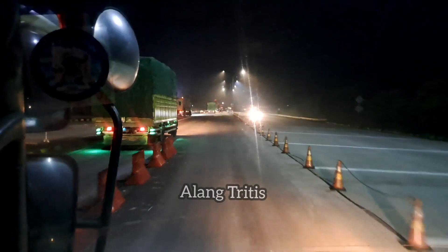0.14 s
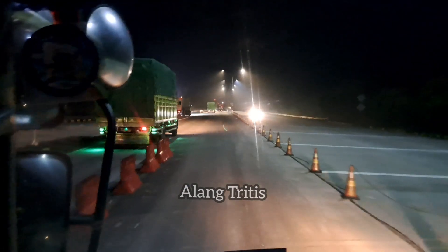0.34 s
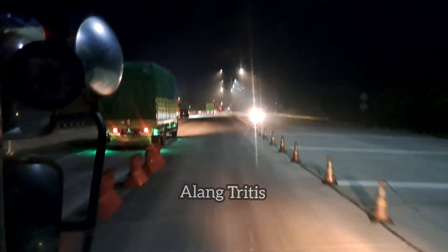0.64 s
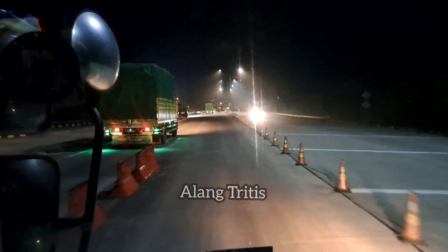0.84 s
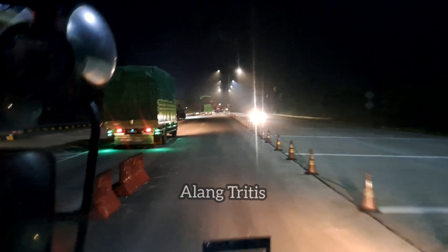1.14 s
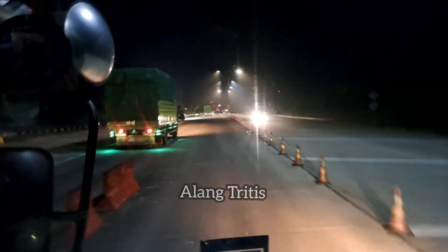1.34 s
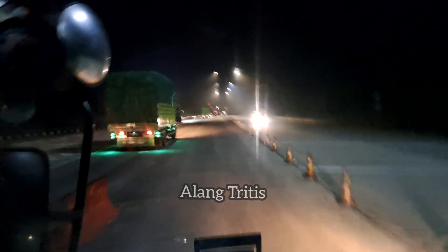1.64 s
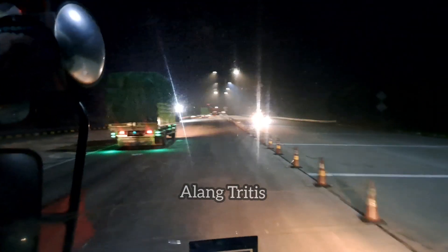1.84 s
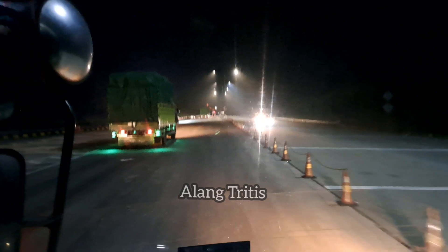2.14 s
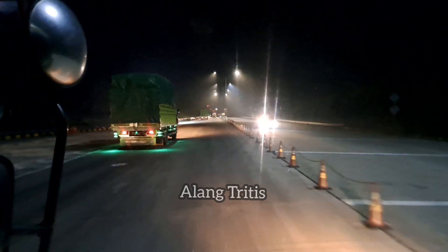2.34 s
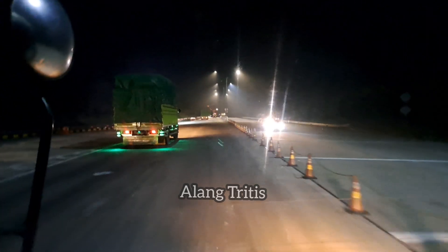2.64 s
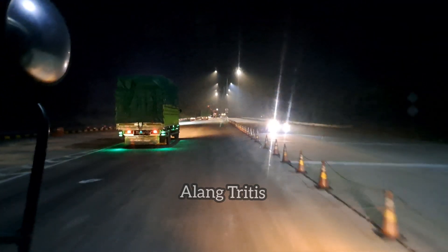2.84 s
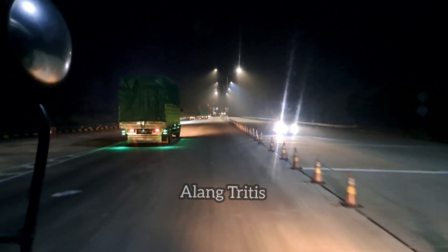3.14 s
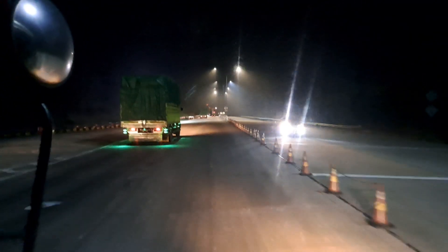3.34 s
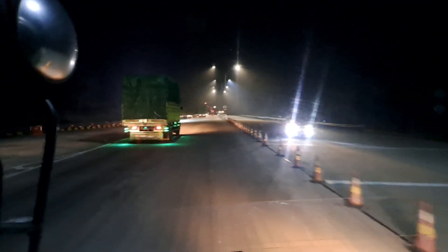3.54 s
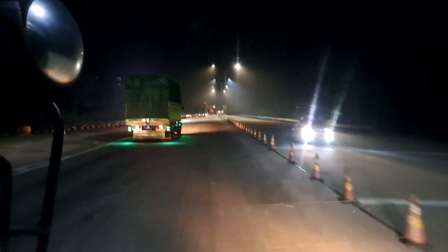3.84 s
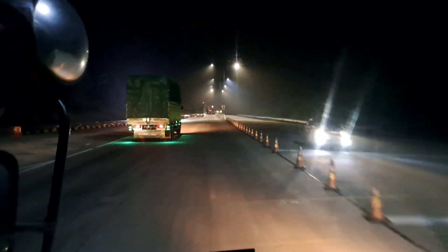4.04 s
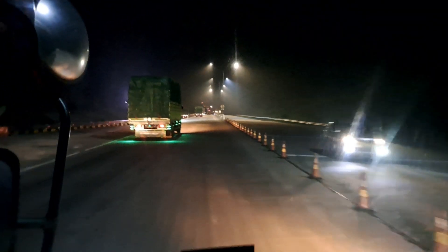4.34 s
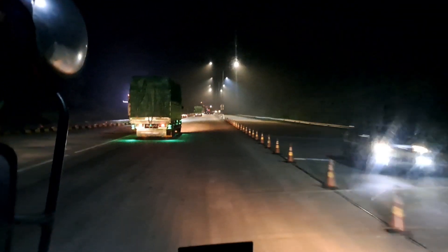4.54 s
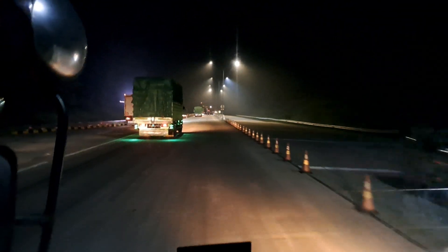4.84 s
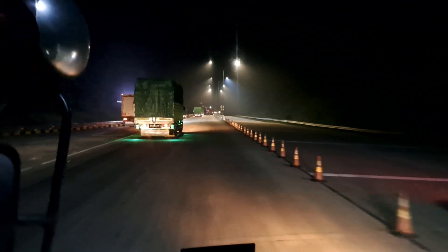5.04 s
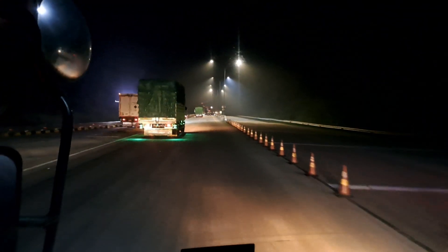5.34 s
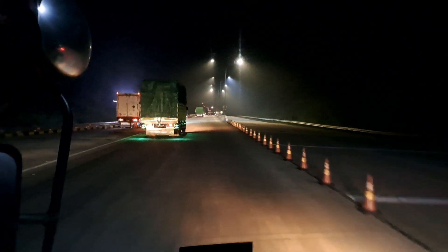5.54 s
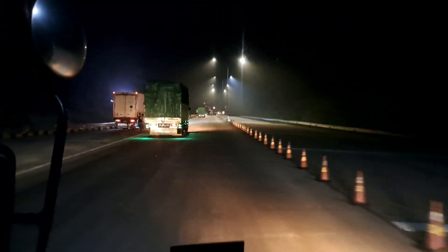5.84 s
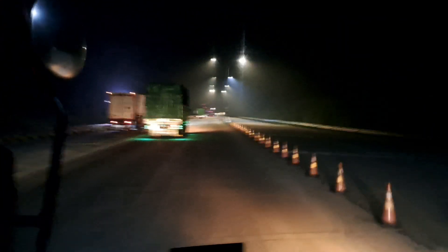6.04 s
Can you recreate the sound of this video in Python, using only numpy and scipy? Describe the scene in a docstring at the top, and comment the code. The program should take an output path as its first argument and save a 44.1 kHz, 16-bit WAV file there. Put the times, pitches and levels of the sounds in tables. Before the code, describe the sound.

Deep diesel boom and fan hum climb over tyre rumble, two short air hisses, then a falling growl, three blips, cab knocks and a renewed pull.

```python
"""In the cab of a diesel truck gathering speed on a road, heard at a microphone with two ports.
Engine and fan pull up in pitch over tyre rumble and driveline hum, and compressed air spits twice.
Then the throttle lifts: the turbo whistle sinks, the engine growls as its revs fall, the cab air drones.
Three throttle blips sound a gear change and bumps knock the cab, then the engine pulls again.
Turning sources are sines, air and tyres are shaped noise, panels and cab are ringing filters."""
import sys
import numpy as np
from scipy import signal
from scipy.io import wavfile

SR = 44100
rng = np.random.default_rng(int(sys.argv[2]) if len(sys.argv) > 2 else 0)


def digitize_waveform(pressure):
    """Quantize a signal to 16-bit integers and store it at the path in sys.argv[1].

    Rows of a 2-D input are taken as channels; values are limited to [-1, 1].
    """
    field = np.atleast_2d(pressure).T
    bounded = np.clip(field, -1, 1)
    quanta = np.round(bounded * 32767).astype(np.int16)
    wavfile.write(sys.argv[1], SR, quanta)


N = 273420
TIME = np.arange(N) / SR   # s
# Levels in the tables are relative: the functions that play them may add trims and flicker.


def from_db(db):
    """Decibels to gain."""
    return 10 ** (np.asarray(db) / 20)


def rms_one(x):
    """Scale to unit rms."""
    return x / np.sqrt(np.mean(x ** 2) + 1e-20)


def in_time(rows):
    """Each column of a curve table, joined by straight lines, at every sample."""
    s, *columns = np.transpose(rows)
    return [np.interp(TIME, s, column) for column in columns]


def at_hz(points, hz):
    """Read a spectrum on a log-frequency axis."""
    point_hz, values = np.array(points).T
    return np.interp(np.log(hz), np.log(point_hz), values)


def drift(rate_hz):
    """Smooth chance motion of spread 1: noise through two equal one-pole low-passes at rate_hz."""
    step = 40   # samples between computed points
    pole = np.exp(-2 * np.pi * rate_hz * step / SR)
    white = rng.standard_normal(N // step + 2002)
    slow = signal.lfilter([1], [1, -2 * pole, pole * pole], white)[2000:]   # settled part
    return np.interp(np.arange(N) / step, np.arange(len(slow)), rms_one(slow))


def turning(hz):
    """Phase of something that turns at a changing rate."""
    return 2 * np.pi * np.cumsum(hz) / SR


def tone(phase, db):
    """A sine of the given rms level."""
    return np.sqrt(2) * from_db(db) * np.sin(phase)


def ring(x, hz, t60):
    """A mode: a unit click sets a sine of height 1 ringing, 60 dB down after t60 seconds."""
    radius, angle = from_db(-60 / (t60 * SR)), 2 * np.pi * hz / SR
    feedback = [1, -2 * radius * np.cos(angle), radius * radius]
    return signal.lfilter([0, np.sin(angle)], feedback, x + 1e-18)


def band_pass(x, low_hz, high_hz, order=2):
    """Butterworth band-pass."""
    band = signal.butter(order, [low_hz, high_hz], "band", fs=SR, output="sos")
    return signal.sosfilt(band, x)


def swells(rows):
    """Gain of smooth bell-shaped swells."""
    return sum(from_db(db) * np.exp(-((TIME - s) / half) ** 2) for s, half, db in rows)


def resonance_gain(modes, hz):
    """Gain of a set of resonances at the given frequencies, summed as powers."""
    power = 0
    for centre, width, db in modes:
        power = power + from_db(db) ** 2 / (1 + (2 * (hz - centre) / width) ** 2) ** 2
    return np.sqrt(power)


# How alike the sound is at the two microphone ports.
# Each row: frequency in Hz, likeness (1 is identical, 0 unrelated).
PORT_LIKENESS = [(25, 0.87), (60, 0.8), (125, 0.9), (250, 0.7), (500, 0.72), (1000, 0.46), (2000, 0.29),
                 (4000, 0.11), (12000, 0.095)]


def noise(spectrum, flicker_db):
    """Third-octave bands of stereo noise, each with its own flicker and likeness; rms 1."""
    edges = 18 * 2 ** (np.arange(31) / 3)   # Hz
    white = rng.standard_normal((2, 2, N))
    out = 0
    for k, (low, high) in enumerate(zip(edges, edges[1:])):
        hz, flicker = np.sqrt(low * high), drift(26.0)
        if spectrum[0][0] <= hz <= spectrum[-1][0] * 2 ** .5:
            mid, side = band_pass(white[k % 2], low, high)   # neighbouring bands draw on separate noise
            alike = np.clip(at_hz(PORT_LIKENESS, hz), 0, 1)
            gain = from_db(at_hz(spectrum, hz) + flicker_db * flicker)
            out = out + gain * (np.sqrt(1 + alike) * mid + np.sqrt(1 - alike) * side * [[1], [-1]])
    return rms_one(out)


# Tyres on the road. Each row: time in seconds, rumble in dB, roar in dB.
ROAD_LEVELS = [(0, -37.5, -39.5), (.4, -40.5, -42.5), (.8, -38.5, -40), (1.4, -35, -40),
               (2.15, -34.5, -37.5), (2.9, -35.5, -39), (3.35, -35, -40.5), (4.2, -37.5, -43),
               (4.55, -34, -43.5), (5.2, -40, -43), (5.8, -35.5, -38.5), (6.2, -37.5, -41)]
# Driveline hum, following road speed. Each row: time in seconds, pitch in Hz, level in dB.
DRIVELINE_HUM = [(0, 45.1, -22), (.6, 48.6, -30), (2.1, 52.2, -34.5), (2.7, 53.37, -24.5),
                 (3.5, 55.67, -18), (3.9, 55.63, -23), (5, 59.5, -59.5), (6.2, 58.85, -40.5)]
# Hollow drone of the cab air, shaken by the road. Each row: time in seconds, level in dB.
CAB_DRONE = [(0, -56.5), (2.5, -37), (2.9, -20.5), (3.3, -21), (4.2, -27.5), (5.1, -29), (6.2, -33.5)]
DRONE_HZ, DRONE_SPREAD_HZ = 115.2, 6.38
# Low tyre rumble, mid tyre roar and tread hiss. Each row: frequency in Hz, density in dB per Hz.
RUMBLE_SPECTRUM = [(20, -36.5), (32, -13), (45, 9), (62, -11), (85, 4), (110, -1), (140, -2.5),
                   (175, -11.5), (230, -7.5), (300, -20.5), (420, -24.5), (700, -50)]
ROAR_SPECTRUM = [(170, -7.5), (260, -17.5), (340, 3), (460, 1), (600, -5.5), (720, 0.5), (900, -6.5),
                 (1100, -4.5), (1400, -18.5), (2000, -20.5), (3500, -38)]
TREAD_SPECTRUM = [(700, -18.5), (1100, -9.5), (1500, 3), (2000, -4.5), (3000, -16)]


def running_gear():
    """Tyres rumble and roar, tread hiss grows with shaft speed, the driveline hums, the cab air drones."""
    rumble_db, roar_db = in_time(ROAD_LEVELS)
    shaft_hz, shaft_db = in_time(DRIVELINE_HUM)
    drone_db, = in_time(CAB_DRONE)
    hum = tone(turning(shaft_hz), shaft_db + drift(7.4))
    drone_phase = turning(DRONE_HZ + DRONE_SPREAD_HZ * drift(11.7))
    drone = tone(drone_phase, drone_db - 3.5 + drift(7.4))
    rumble = from_db(rumble_db + 10.5) * noise(RUMBLE_SPECTRUM, flicker_db=2.0)
    roar = from_db(roar_db + 5.0) * noise(ROAR_SPECTRUM, flicker_db=1.5)
    tread_db = -53.5 + 65 * np.log10(shaft_hz / shaft_hz.mean())
    tread = from_db(tread_db) * noise(TREAD_SPECTRUM, flicker_db=4.0)
    return hum + drone + rumble + roar + tread


# Spits of air. Each row: start in seconds, level in dB, rise in seconds, 60 dB fall in seconds.
AIR_SPITS = [(1.089, -37, 0.012, 0.29), (1.26, -35.5, 0.062, 0.38)]
# Colour of the escaping air. Each row: frequency in Hz, density in dB per Hz.
PUFF_SPECTRUM = [(1500, -28), (3000, 8), (4500, 8), (7000, 2), (9000, -5), (12000, -2), (16000, -4.5)]


def air_valve():
    """A sharp spit of compressed air, then a soft swell."""
    flow = 0
    for start, db, rise, t60 in AIR_SPITS:
        age = np.maximum(TIME - start, 0)
        flow = flow + (1 - np.exp(-age / rise)) * from_db(db - 60 * age / t60)
    return flow * noise(PUFF_SPECTRUM, flicker_db=1.2)


# Airy breath of the turbo, also the colour of the swishes. Each row: frequency in Hz, density in dB per Hz.
BREATH_SPECTRUM = [(7000, -5), (10000, -6), (12000, 5.5), (14000, 0.5), (16000, -2.5)]
# Faint high swishes. Each row: top in seconds, half length in seconds, level in dB.
HIGH_SWISHES = [(4.69, 0.01, -64), (5.06, 0.14, -66), (5.72, .04, -65), (5.95, 0.016, -60.5)]


def swishes():
    """Bell-shaped swells of faint, high noise."""
    return swells(HIGH_SWISHES) * noise(BREATH_SPECTRUM, flicker_db=2.5)


# A loose panel over rougher patches. Each row: top in seconds, half length in seconds, level in dB.
PANEL_SHUDDERS = [(2.86, .045, -30.5), (4.635, .025, -33.5)]


def shudder():
    """A loose panel swings up and dies away at its own unsteady pitch."""
    hz = 314 + 11.5 * drift(31)
    return swells(PANEL_SHUDDERS) * tone(turning(hz), 0)


# Knocks of the cab over bumps.
# Each row: start in seconds, level in dB, brightness in dB per octave, trim rattle in dB.
CAB_KNOCKS = [(2.876, -38, 0, -63), (4.384, -28, -8, -80), (4.392, -14.5, 1, -70), (4.406, -19, 0, -72),
              (4.618, -30, -1, -76), (4.632, -30, -3, -80), (4.763, -23.5, 3, -61), (4.771, -22, 4, -55),
              (5.188, -31, -2, -80)]
# What the cab rings with. Each row: frequency in Hz, level in dB, 60 dB fall in seconds.
CAB_RINGS = [(180, 5.5, 0.019), (200, 4, 0.024), (268, -4.5, 0.065), (318, 0, 0.014), (396, -6, 0.064),
             (470, -0.5, 0.0088), (587, -19, 0.024), (760, -8, 0.031), (814, -14, 0.022), (990, -14, 0.026)]
# Rattle of loose trim, and dull crunch of the cab mounts. Each row: frequency in Hz, density in dB per Hz.
TRIM_SPECTRUM = [(2500, -11), (5000, -1.5), (8000, -5), (12000, -5), (16000, -12)]
CRUNCH_SPECTRUM = [(140, 3.5), (260, 5), (500, -2), (900, -9), (1300, -19)]


def knocks(rattle_t60, crunch_db, crunch_t60):
    """Each knock crunches in the mounts, rings the cab and shakes a short rattle, set per knock, from loose trim."""
    ringing, rattle, crunch = np.zeros((2, N)), np.zeros(N), np.zeros(N)
    start_s, level_db, bright_db, _ = np.transpose(CAB_KNOCKS)
    for k, (hz, db, t60) in enumerate(CAB_RINGS):
        strength_db = level_db + db + bright_db * np.log2(hz / 300)
        scatter_db = rng.normal(0, 1, (len(start_s), 2))
        clicks = np.zeros((2, N))
        clicks[:, (start_s * SR).astype(int)] = from_db(strength_db[:, None] + scatter_db).T
        ringing += (-1) ** (k // 2) * ring(clicks, hz, t60)   # panels swing in opposite directions
    for start, db, _, rattle_db in CAB_KNOCKS:
        age = np.abs(TIME - start)
        struck = np.clip((TIME - start) / 0.0029, 0, 1)   # silent before, full after 2.9 ms
        rattle += struck * from_db(rattle_db - 60 * age / rattle_t60)
        crunch += struck * from_db(db + crunch_db - 60 * age / crunch_t60)
    rattling = rattle * noise(TRIM_SPECTRUM, flicker_db=2.5)
    return ringing + rattling + crunch * noise(CRUNCH_SPECTRUM, flicker_db=1)


# Turbo whistle. Each row: time in seconds, level in dB.
TURBO_WHISTLE = [(0, -75.5), (2.15, -71), (2.35, -72), (2.48, -65), (2.68, -70), (3.1, -69), (3.45, -73),
                 (3.9, -78), (4.25, -69), (4.45, -87)]
TURBO_START_HZ, TURBO_TOP_HZ, TURBO_IDLE_HZ, SPOOL_HZ_PER_S = 12700, 15800, 1650, 2700
LIFT_S, RUN_DOWN_S = 2.1, 1.0   # throttle lifted; time to fall halfway to idle pitch
# Thin hiss in the intake pipe. Each row: top in seconds, half length in seconds, level in dB.
PIPE_SWELLS = [(1.05, 0.095, -53), (2.38, 0.15, -53)]


def turbo(breath_db, breath_db_per_octave):
    """A breathy whistle climbs under load and sinks as air drag slows the turbine; the intake pipe hisses."""
    spooled_hz = np.minimum(TURBO_START_HZ + SPOOL_HZ_PER_S * TIME, TURBO_TOP_HZ)
    slowing = 1 + np.maximum(TIME - LIFT_S, 0) / RUN_DOWN_S
    hz = TURBO_IDLE_HZ + (spooled_hz - TURBO_IDLE_HZ) / slowing
    whistle_db, = in_time(TURBO_WHISTLE)
    blur = 1 + .02 * np.array([drift(450), drift(450)])   # the cab scatters the pitch at each port
    whistle = np.array([tone(turning(hz * port), whistle_db - .5 + 3 * drift(15)) for port in blur])
    level_db = breath_db + breath_db_per_octave * np.log2(hz / TURBO_TOP_HZ)
    breath = from_db(level_db) * noise(BREATH_SPECTRUM, flicker_db=6.0)
    pipe = rms_one(ring(rng.standard_normal((2, N)), hz=4440, t60=0.0069))
    return whistle + breath + swells(PIPE_SWELLS) * pipe


# Engine speed without blips: a long pull, a coast down to idle, a pull in the next gear.
# Each row: time in seconds, firings per second.
ENGINE_REVS = [(0, 81.8), (.5, 89.7), (1, 97.8), (1.7, 111.8), (1.95, 111.5), (2.15, 113.6), (2.9, 82.6),
               (3.15, 73.5), (3.65, 60), (3.95, 53.5), (4.9, 54), (5.3, 56.4), (5.8, 76.3), (6, 70.3),
               (6.2, 75)]
# Exhaust boom at the firing rate, without blips. Each row: time in seconds, level in dB.
BOOM_LEVEL = [(0, -10.5), (.85, -12), (1.05, -15), (1.35, -16.5), (1.95, -25), (2.15, -34.5), (3.1, -23.5),
              (3.55, -27), (3.78, -23.5), (4.68, -15.5), (4.78, -24.5), (5.25, -17.5), (5.5, -10.5),
              (5.85, -17.5), (6.12, -13)]
# Engine load. Each row: time in seconds, combustion clatter in dB, intake hiss in dB.
LOAD_LEVELS = [(0, -43.5, -57.5), (.3, -45.5, -62), (.45, -43.5, -60), (.72, -43.5, -61.5), (1, -41.5, -59),
               (1.45, -45, -60), (2.08, -42.5, -59.5), (2.25, -45, -64), (2.85, -43.5, -62),
               (3.15, -47.5, -65), (3.8, -51, -64.5), (4.65, -56, -68.5), (4.9, -51, -66), (5.18, -55, -65),
               (5.33, -47.5, -67.5), (5.65, -45.5, -65.5), (6.2, -46.5, -67.5)]
# Throttle blips during the gear change. Each row: start in seconds, seconds from start until the pedal lifts,
# revs gained in firings per second, boom in dB, clatter rise in dB.
THROTTLE_BLIPS = [(3.941, 0.1328, 12, -12, 5), (4.389, .1, 3.5, -12.5, 5.5), (4.886, 0.105, 11, -10.5, 3.5)]
PEDAL_ATTACK_S, PEDAL_RELEASE_S, COAST_S = 0.0628, 0.092, .24
FUEL_CUT_DB = 1   # boom lost per surplus firing per second, as the pedal lifts


def throttle():
    """Speed, boom and clatter of the engine: blips raise all three, then revs coast back with fuel cut."""
    rate, = in_time(ENGINE_REVS)
    boom_db, = in_time(BOOM_LEVEL)
    clatter_db, hiss_db = in_time(LOAD_LEVELS)
    for start, held, gained, blip_db, rise_db in THROTTLE_BLIPS:
        age, shut = TIME - start, held + PEDAL_RELEASE_S
        pedal = np.interp(age, [0, PEDAL_ATTACK_S, held, shut], [0, 1, 1, 0])
        surplus = np.interp(age, [PEDAL_ATTACK_S / 2, shut, shut + COAST_S], [0, gained, 0])
        rate = rate + surplus
        unfuelled = from_db(boom_db - FUEL_CUT_DB * surplus)
        boom_db = 20 * np.log10(pedal * from_db(blip_db) + (1 - pedal) * unfuelled)
        clatter_db = clatter_db + rise_db * pedal
    return rate, boom_db, clatter_db, hiss_db


OVERRUN_FALL, OVERRUN_BUILD_S = 32.2, 0.07   # full at this fall in firings per s, each s; smoothing time
OVERRUN_GONE, OVERRUN_FULL = 70, 92   # fades between these revs, firings per s


def overrun():
    """0 while the engine pulls or idles, building to 1 as the truck pushes it and revs fall from high."""
    rate, = in_time(ENGINE_REVS)
    keep = np.exp(-1 / (OVERRUN_BUILD_S * SR))
    fall = np.clip(-np.gradient(rate) * SR / OVERRUN_FALL, 0, 1)
    falling = signal.lfilter([1 - keep], [1, -keep], fall)
    return falling * np.interp(rate, [OVERRUN_GONE, OVERRUN_FULL], [0, 1])


# Panels that carry the fan note into the cab. Each row: frequency in Hz, width in Hz, level in dB.
FAN_PANEL_MODES = [(202.5, 22.3, -33.5), (230.5, 11, -31.5), (258.9, 21, -30.5), (316.5, 24, -35),
                   (340, 8.1, -41), (467, 54, -33), (524, 35, -39.5), (567.4, 46, -37), (687, 81, -35),
                   (853, 58, -41), (1010, 100, -41.5)]


def fan(level_db, overtone_db, fall_db, flutter_db, rough, count=4):
    """Blades chop the air in step with the revs, too heavy to follow blips; panel resonances swell the notes."""
    hz = 3.09 * in_time(ENGINE_REVS)[0]   # blade passes per firing
    blade = turning(hz) + rough * drift(30)   # uneven inflow roughens the note
    out = 0
    for k in range(1, count + 1):
        harmonic_db = level_db if k == 1 else overtone_db - fall_db * (k - 2)
        db = harmonic_db + k * flutter_db * drift(19)   # higher notes are patchier
        port_phase = np.array([[0], [.5 * k - .8]])
        out = out + resonance_gain(FAN_PANEL_MODES, k * hz) * tone(k * blade + port_phase, db)
    return out


# Air resonances of the cab that engine notes sweep through.
# Each row: frequency in Hz, width in Hz, level in dB.
CAB_AIR_MODES = [(87, 13, -32.5), (115.2, 35, -33), (153, 16, -34), (168, 53, -40), (188, 17, -33.5),
                 (226.2, 3.2, -36), (366, 26, -34)]


def pump(rate, level_db):
    """A belt-driven pump's hum swells when its note crosses the highest air resonance."""
    hz = 3.9 * rate   # pump cycles per firing
    return resonance_gain(CAB_AIR_MODES[-1:], hz) * tone(turning(hz), level_db + 4.8 * drift(23))


# Bright clatter, duller diesel knock and intake rush. Each row: frequency in Hz, density in dB per Hz.
CLATTER_SPECTRUM = [(800, -36), (1200, -3.5), (1600, -3.5), (2250, 4), (2800, -2.5), (3500, -6.5),
                    (4400, -13), (5200, -15), (6000, -27.5), (7000, -25.5), (8000, -24.5), (12000, -43.5)]
KNOCK_SPECTRUM = [(800, -8.5), (1150, 6), (1600, 0), (2100, -10.5)]
RUSH_SPECTRUM = [(2500, -24.5), (4200, 10), (5500, 4.5), (7000, 5), (8200, -3), (9700, 2.5), (11000, -6),
                 (12200, -4.5), (14000, -12.5), (16000, -13)]


def combustion(firing, rate, clatter_db, hiss_db, throb, knock_throb):
    """Injector clatter pulses with firing over intake rush; it rings at high revs, knocks duller at low revs."""
    stroke = np.cos(firing) + .6 * np.cos(firing / 2) + .5 * np.cos(firing / 4)
    octaves = np.log2(rate / rate.mean())
    injector = rms_one(ring(rng.standard_normal((2, N)), hz=2300, t60=.006))
    ringing = from_db(-7.5 + 14.4 * octaves + 2.5 * drift(25)) * injector
    # a thin engine cover buzzes with the clatter
    cover = rms_one(band_pass(rng.standard_normal((2, N)), 2414, 2960, order=3))
    buzz = from_db(-9.5 - 3.5 * octaves) * cover
    bright = noise(CLATTER_SPECTRUM, flicker_db=1.5) + ringing + buzz
    clatter = from_db(clatter_db - 2.0) * rms_one(np.exp(throb * stroke)) * bright
    knock_gain = from_db(clatter_db - 1.0 - 10.7 * octaves) * rms_one(np.exp(knock_throb * stroke))
    knock = knock_gain * noise(KNOCK_SPECTRUM, flicker_db=2.4)
    rush = from_db(hiss_db + 7.5 + .5 * drift(15)) * noise(RUSH_SPECTRUM, flicker_db=1.0)
    return (clatter + knock + rush) * from_db(.5 * drift(23))


# Cab panels that the engine block thuds into. Each row: frequency in Hz, width in Hz, level in dB.
BLOCK_PANELS = [(352.6, 27, -7), (425, 62, 1.5), (488, 61, 1), (580, 71, -6), (715, 130, -2)]
# Growl of those panels, strongest at high revs and on the overrun. Each row: time in seconds, level in dB.
GROWL_LEVEL = [(0, -53.5), (1.3, -53), (2.0, -35), (2.5, -41), (2.85, -36), (3.3, -40), (4.1, -43),
               (5.2, -55), (5.85, -50.5), (6.2, -55)]
# Strength of the firing of each cylinder in turn, in dB.
CYLINDER_STRENGTH = [2, -0.77, 1, -3.2]


def block(firing, throb, thud_db, scatter_db):
    """Unequal cylinder firings thud into cab panels over a rough shaking that pulses with them: a growl."""
    growl_db, = in_time(GROWL_LEVEL)
    shake = rng.standard_normal((2, N)) * np.exp(throb * (np.cos(firing) + np.cos(firing / 2)))
    fired = np.flatnonzero(np.diff(firing // (2 * np.pi)))   # sample of each firing
    scatter = scatter_db * rng.standard_normal(len(fired))
    thuds = np.zeros(N)
    thuds[fired] = from_db(np.resize(CYLINDER_STRENGTH, len(fired)) + scatter)
    drive = rms_one(shake) + from_db(thud_db) * rms_one(thuds)
    out = 0
    for hz, width, db in BLOCK_PANELS:
        out = out + from_db(db) * rms_one(band_pass(drive, hz - width / 2, hz + width / 2))
    return from_db(growl_db) * rms_one(out)


LUG_DB, LUG_FALL_DB = -21, 17   # octave above the boom at lowest revs, and its loss per octave of revs


def exhaust(firing, rate, boom_db, uneven_db, second_db, fifth_db):
    """The firing rate booms, sharper at low revs; three unsteady overtones swell in the cab air resonances."""
    lean_db = .1 - 1.0 * np.log2(rate / rate.mean())   # the standing wave shifts sideways with pitch
    boom = tone(firing, boom_db + 0.5 * drift(44) + lean_db * [[1], [-1]])
    lug_db = LUG_DB - LUG_FALL_DB * np.log2(rate / rate.min())
    out = boom + tone(2 * firing, boom_db + lug_db)
    for order, db in ((1.5, uneven_db), (2, second_db), (5, fifth_db)):
        overtone = tone(order * firing, db + 1.6 * drift(3.0))
        out = out + resonance_gain(CAB_AIR_MODES, order * rate) * overtone
    return out


PORT_LAG_MS, LEFT_DB = .4, 0.64   # right port lags; left is raised and right lowered by LEFT_DB


def scene():
    """All sources reach the left port a little earlier and louder; on the overrun the fan is louder, rougher."""
    rate, boom_db, clatter_db, hiss_db = throttle()
    firing, pushed, octaves = turning(rate), overrun(), np.log2(rate / rate.mean())
    cab = running_gear() + air_valve() + swishes() + shudder()
    cab = cab + knocks(rattle_t60=.11, crunch_db=-6.5, crunch_t60=0.057)
    engine = turbo(breath_db=-63.5, breath_db_per_octave=19.0)
    engine = engine + fan(level_db=-0.5 + 2.2 * pushed + 3 * octaves,
                          overtone_db=-10.5 + 8.1 * pushed + 3.4 * octaves,
                          fall_db=3.5, flutter_db=1.15 + 0.4 * pushed, rough=0.14 + .03 * pushed)
    engine = engine + pump(rate, level_db=-3.5 - 5.8 * pushed)
    engine = engine + combustion(firing, rate, clatter_db, hiss_db, throb=0.075, knock_throb=0.11)
    engine = engine + block(firing, throb=0.72, thud_db=-2, scatter_db=0.5)
    engine = engine + exhaust(firing, rate, boom_db, uneven_db=-3.5 + 9.7 * octaves,
                              second_db=-0.3 - 8.4 * pushed, fifth_db=-5.0)
    left, right = cab + engine
    lag = np.round(PORT_LAG_MS * SR / 1000)   # whole samples
    right = np.interp(np.arange(N) - lag, np.arange(N), right)
    return np.array([left, right]) * from_db([[LEFT_DB], [-LEFT_DB]])


# Treble colour of the microphone. Each row: frequency in Hz, width in Hz, level in dB.
MICROPHONE_COLOUR = [(3140, 420, 2), (9300, 1000, 1.5), (10400, 960, -0.5), (12200, 1200, 4),
                     (14300, 1700, 1.5)]
CUTOFF_HZ = 15750


def record(dry):
    """The microphone colours the treble with resonant peaks and dips; the top is cut steeply."""
    for hz, width, db in MICROPHONE_COLOUR:
        peak = signal.lfilter(*signal.iirpeak(hz, hz / width, fs=SR), dry)
        dry = dry + (from_db(db) - 1) * peak
    steep_cut = signal.ellip(12, .2, 90, CUTOFF_HZ, fs=SR, output="sos")
    return signal.sosfilt(steep_cut, dry)


dry = scene()
out = record(dry)
digitize_waveform(out)
```